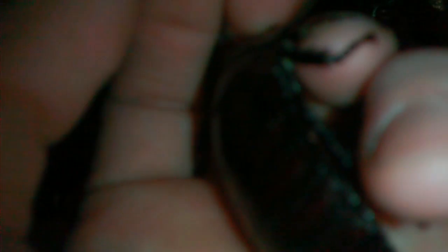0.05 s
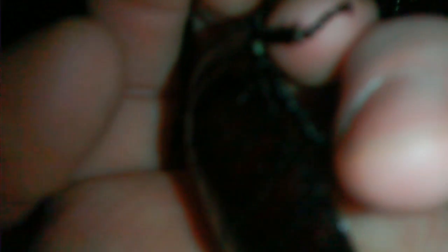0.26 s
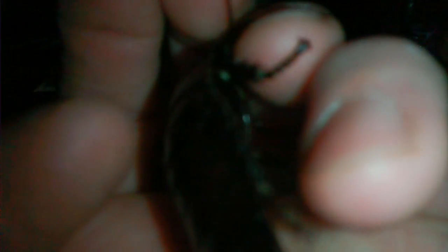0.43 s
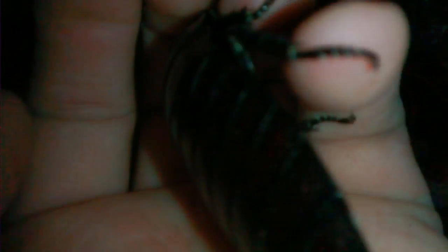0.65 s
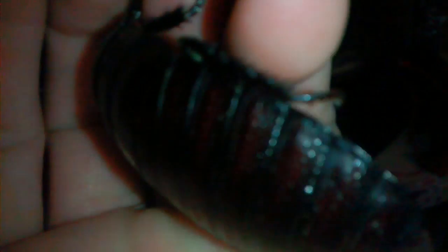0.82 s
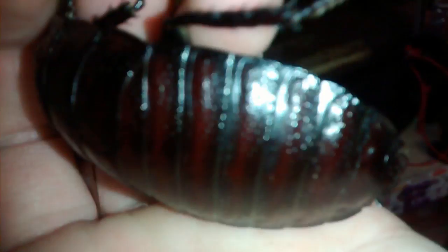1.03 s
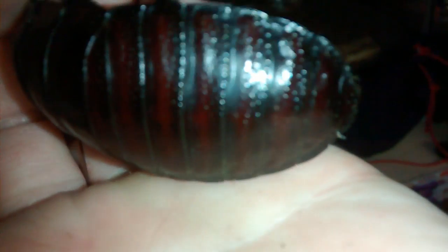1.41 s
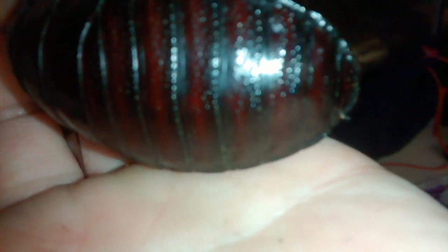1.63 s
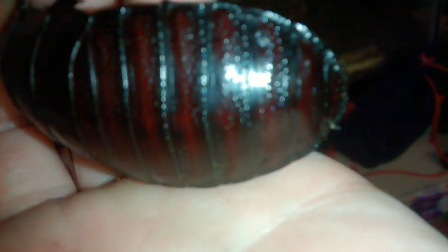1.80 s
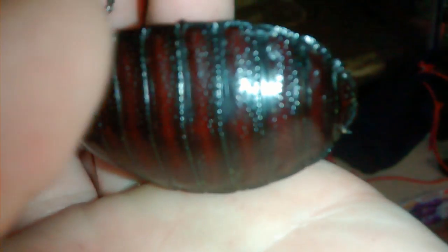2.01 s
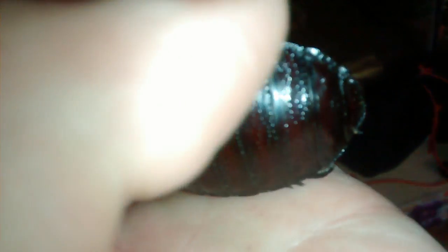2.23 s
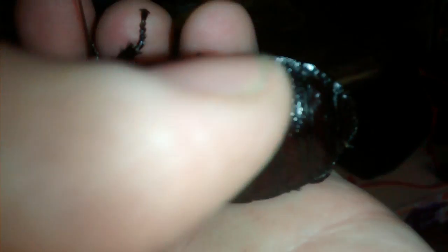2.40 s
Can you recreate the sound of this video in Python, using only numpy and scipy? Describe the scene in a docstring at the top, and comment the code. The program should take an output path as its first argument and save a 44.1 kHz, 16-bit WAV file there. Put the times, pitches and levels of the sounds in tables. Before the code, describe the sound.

A cockroach hisses close to the microphone: from 0.2 seconds a sharp, unbroken jet of air swells, ending in a fuller gush at 0.8. Faint, high ticks come at 0.9 and 1.4. At 1.7 it sputters four times, with a tiny whistle, then catches into a slightly softer second hiss that brightens and ends in a gush at 2.3. Quiet room air and a low hum lie underneath.

```python
"""A sharp hiss over quiet room air: a hissing cockroach, held in a hand close to a stereo microphone.
It forces air through its spiracles twice. Each hiss swells, brightens with the pressure and ends in a
fuller gush; the second sputters, with a tiny whistle, before it catches.
Between the hisses come two faint, high ticks, and a low hum lies under it all."""
import sys
import numpy as np
from scipy import signal
from scipy.fft import rfft, irfft, next_fast_len
from scipy.io import wavfile
from scipy.ndimage import uniform_filter1d, map_coordinates

SR = 44100
rng = np.random.default_rng(int(sys.argv[2]) if len(sys.argv) > 2 else 0)


def store_pcm(level_fs):
    """Save levels as 16-bit WAV."""
    pcm = np.round(np.clip(level_fs, -1, 1) * 32767).astype(np.int16)
    wavfile.write(sys.argv[1], SR, np.atleast_2d(pcm).T)


N = 112454
TIME = np.arange(N) / SR
FFT_SIZE = next_fast_len(N + SR // 2)
FREQS = np.fft.rfftfreq(FFT_SIZE, 1 / SR)


def amp(db):
    """Decibels to gain."""
    return 10 ** (np.asarray(db) / 20)


def along(table, hz, column=1):
    """One column of a table, read on a log-frequency axis."""
    columns = np.transpose(table)
    return np.interp(np.log(hz + 1), np.log(columns[0] + 1), columns[column])


def wobble(knots_per_s):
    """A smooth random curve."""
    knots = rng.standard_normal(int(N * knots_per_s / SR) + 4)
    return map_coordinates(knots, [TIME * knots_per_s])


def filtered(sound, response):
    """The sound through a response given at FREQS."""
    return irfft(rfft(sound, FFT_SIZE) * response, FFT_SIZE)[..., :N]


def panned(balance_db):
    """Left and right gains, balance_db apart."""
    return amp(np.array([[balance_db], [-balance_db]]) / 2)


def resonance(centre_hz, width_octaves):
    """Noise of rms 1 in one resonance."""
    octaves_off = np.log2((FREQS + 1) / centre_hz)
    ring = filtered(rng.standard_normal(N), 1 / (1 + (octaves_off / width_octaves) ** 2))
    return ring / ring.std()


def rush(colour, likeness, lead=None):
    """Stereo noise of rms 1, coloured for each side of the microphone; the left may lead in phase."""
    mid, side = rfft(rng.standard_normal((2, FFT_SIZE)))
    spread = np.arccos(np.clip(along(likeness, FREQS), -1, 1)) / 2
    left = (np.cos(spread) * mid + np.sin(spread) * side) * amp(along(colour, FREQS, column=1))
    right = (np.cos(spread) * mid - np.sin(spread) * side) * amp(along(colour, FREQS, column=2))
    if lead:
        left = left * np.exp(1j * along(lead, FREQS))
    pair = irfft(np.array([left, right]), FFT_SIZE)[:, :N]
    return pair / pair.std()


# The hum and its overtone: f/Hz, level/dB, left minus right/dB
HUM_LINES = [(43.1, -62, .5), (259, -71.5, -1)]
def hum(left_lead_rad=1.47):
    """A low, steady 43 Hz hum with a faint overtone."""
    lead = np.array([[left_lead_rad], [0]])
    tones = np.zeros((2, N))
    for hz, db, balance_db in HUM_LINES:
        phase = 2 * np.pi * hz * TIME + lead + 0.042 * wobble(3.3)
        tones += amp(db) * panned(balance_db) * np.sqrt(2) * np.sin(phase)
    return tones


# Colour of the room air: f/Hz, left level/dB, right level/dB (relative)
AIR_COLOUR = [(28, -8, -9), (69.4, -3.5, -6.5), (132, -2.5, 0.5), (190, -2, -6), (240, -3, 0.5),
              (404, -5.5, -3.5), (640, -8.5, -6), (1310, -12.5, -12.5), (1920, -12, -10), (2600, -17, -15),
              (3900, -16, -11), (6900, -19.5, -21), (15000, -24, -23.5)]
# How alike the air is on both sides of the microphone: f/Hz, correlation
AIR_LIKENESS = [(50, -0.44), (150, -0.81), (300, -0.37), (600, 0.44), (1250, 0.96), (2000, -0.58),
                (2600, -0.75), (3700, 0.8), (4800, -0.43), (6500, 0.053)]
def room_air(level_db=-52):
    """The steady air of a quiet room, all around the microphone."""
    return amp(level_db) * rush(AIR_COLOUR, AIR_LIKENESS)


# Ticks between the hisses: t/s, level/dB, f/Hz, left minus right/dB
FAINT_TICKS = [(.8738, -54, 6500, 4), (1.4128, -36.5, 4050, -5)]
def ticks(rise_s=.001, t60_s=.016):
    """Two faint, short, high ticks close to the microphone, left then right."""
    clicks = np.zeros((2, N))
    for start, db, hz, balance_db in FAINT_TICKS:
        age = np.maximum(TIME - start, 0)
        envelope = amp(db - 60 * age / t60_s) * (1 - np.exp(-age / rise_s))
        clicks += panned(balance_db) * envelope * resonance(hz, width_octaves=.12)
    return clicks


def pressure(puffs, swell_share=0.7):
    """Each puff opens, climbs for swell_share of its length to its final level, holds and shuts."""
    total = np.zeros(N)
    for start, end, db, swell_db, attack, release in puffs:
        swell_left = np.clip(1 - (TIME - start) / (swell_share * (end - start)), 0, 1)
        opening = np.sin(np.pi / 2 * np.clip((TIME - start) / attack, 0, 1))
        closing = np.sin(np.pi / 2 * np.clip((end - TIME) / release, 0, 1)) ** 2
        total += opening * closing * amp(db - swell_db * swell_left)
    return total


# Whistling puff: start t/s, end t/s, final level/dB, swell/dB, attack/s, release/s
WHISTLE_PUFF = [(1.685, 1.707, -51.5, 0, .005, .012)]
def whistle():
    """The barely open spiracle whistles in the first sputter, dead centre."""
    return pressure(WHISTLE_PUFF) * resonance(3096, width_octaves=0.018)


# How alike a jet is on both sides of the microphone: f/Hz, correlation before the phase lead
JET_LIKENESS = [(500, 0.34), (1950, 1), (2700, 1), (4200, 0.58), (5400, 0.98), (7000, 0.44), (8500, 1),
                (14000, 0.23)]
def jet(puffs, colour, lead, brighten_per_octave, pivot_hz=6360, waver_db=0.22, flutter_db=0.32):
    """Turbulent air through the spiracle's resonances: more pressure is louder and brighter."""
    drive = pressure(puffs)
    typical = np.average(drive, weights=drive ** 2)
    hz, frame_times, bands = signal.stft(rush(colour, JET_LIKENESS, lead), SR, nperseg=128)
    push = np.interp(frame_times, TIME, drive / typical)
    # Above the pivot the jet grows faster than the pressure, below it more slowly.
    growth = np.clip(1 + brighten_per_octave * np.log2((hz + 1) / pivot_hz), .6, 2)
    # Turbulence lets each band waver.
    patches = uniform_filter1d(rng.standard_normal(bands.shape), size=3, axis=0)
    patches = uniform_filter1d(patches, size=24, axis=1)
    gain = push ** growth[:, None] * amp(waver_db * patches / patches.std())
    air = signal.istft(bands * gain, SR, nperseg=128)[1][:, :N]
    return air * typical * amp(flutter_db * wobble(knots_per_s=57))


# One long breath: start t/s, end t/s, final level/dB, swell/dB, attack/s, release/s
LONG_PUFF = [(.204, .79, -29, 6, 0.036, 0.074)]
# Its spiracle resonances, close up: f/Hz, left level/dB, right level/dB (relative)
LONG_COLOUR = [(507, -42, -41), (1290, -30, -29), (1770, -18, -16.5), (3080, -13.5, -15.5),
               (3530, -27.5, -25), (4320, -12.5, -13), (4840, -17.5, -9), (5450, -8, -9.5), (6540, -8, -23),
               (7400, -6.5, -16), (7920, -8, -20), (8240, 1, -9), (9270, -6, -19), (9970, -19, -24),
               (11600, -14.5, -25.5), (13000, -20, -37), (15300, -24.5, -49)]
# Left-right phase lead of the first hiss at the microphone: f/Hz, left lead/rad
LONG_LEAD = [(1200, 0), (2000, 3.1), (2700, 3.2), (3400, 6.2), (4600, 6.2), (5200, 9.4), (5650, 9.5),
             (6600, 13.6), (7600, 16), (8500, 17.8), (9500, 18.4), (15000, 29)]
def first_hiss():
    """Close to the microphone, the insect forces out one unbroken jet."""
    return jet(LONG_PUFF, LONG_COLOUR, LONG_LEAD, brighten_per_octave=0.2)


# Four sputters and a breath: start t/s, end t/s, final level/dB, swell/dB, attack/s, release/s
SPUTTER_PUFFS = [(1.684, 1.707, -49, -1, 0.0069, 0.0062), (1.735, 1.76, -45.5, 3, .007, 0.0029),
                 (1.774, 1.801, -46.5, -1.5, 0.0062, 0.0044), (1.818, 1.874, -42, 4, 0.0049, 0.0037),
                 (1.873, 2.29, -32, 8, 0.0066, 0.033)]
# Their spiracle resonances, close up: f/Hz, left level/dB, right level/dB (relative)
SPUTTER_COLOUR = [(500, -33, -31), (1280, -25.5, -24), (2030, -15.5, -14.5), (2870, -5.5, -7),
                  (3670, -14, -14), (4480, -13.5, -8.5), (5300, -4, 0), (6730, 2.5, -12), (8030, 3, -14),
                  (8920, -6, -17), (10420, -13, -20), (11900, -32, -35), (13200, -16.5, -36),
                  (15300, -31, -43)]
# Left-right phase lead of the second hiss and both closing gushes: f/Hz, left lead/rad
SHARED_LEAD = [(1200, 0), (2000, 3.1), (2600, 3.2), (3400, 6.1), (4200, 7.1), (4800, 9.3), (5500, 10.7),
               (6500, 13.6), (7300, 15.3), (8200, 18), (9000, 18.8), (15000, 31)]
def second_hiss():
    """The jet sputters, catches and brightens steeply as the pressure climbs."""
    return jet(SPUTTER_PUFFS, SPUTTER_COLOUR, SHARED_LEAD, brighten_per_octave=0.78)


# Last air of each hiss: start t/s, end t/s, final level/dB, swell/dB, attack/s, release/s
CLOSING_PUFFS = [(.73, .82, -26.5, 3.5, 0.01, 0.061), (2.228, 2.304, -34, 1.5, 0.023, 0.026)]
# Its fuller colour, close up: f/Hz, left level/dB, right level/dB (relative)
CLOSING_COLOUR = [(500, -28, -34), (1100, -28, -19), (1980, -1.5, 0), (3130, 2.5, 0), (3800, -2, 0),
                  (3980, 2, -0.5), (4700, -4.5, 3.5), (6000, 5, 0.5), (7060, 2, -8), (8560, 1, -4),
                  (9100, -2, -10), (10200, -0.5, -4), (13000, -9.5, -29), (15000, -14, -68)]
def gushes():
    """A short, fuller rush of air ends each hiss."""
    return jet(CLOSING_PUFFS, CLOSING_COLOUR, SHARED_LEAD, brighten_per_octave=0.33)


def scene():
    """The insect in the hand up front, the quiet room behind."""
    cockroach = first_hiss() + second_hiss() + gushes() + whistle()
    return cockroach + ticks() + hum() + room_air()


def record(dry):
    """The recorder keeps nothing above its band limit."""
    top_hz = 15550
    return filtered(dry, FREQS < top_hz)


dry = scene()
out = record(dry)
store_pcm(out)
```